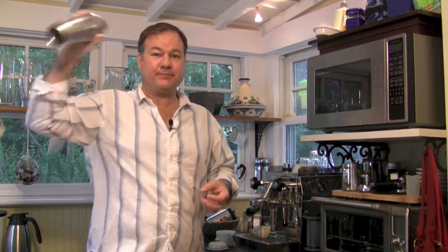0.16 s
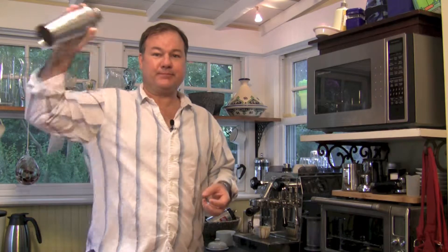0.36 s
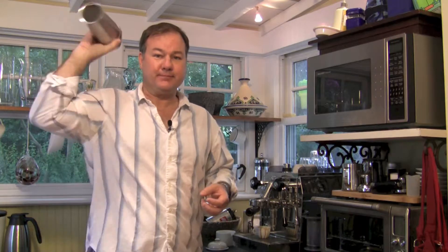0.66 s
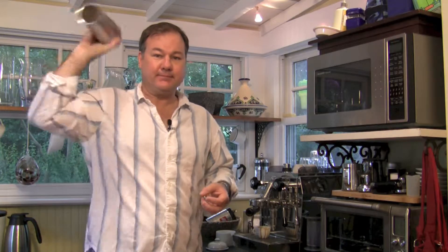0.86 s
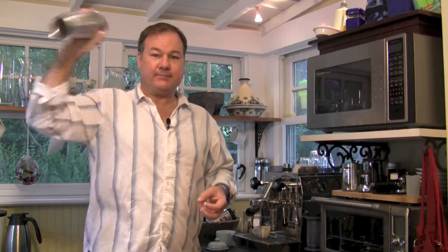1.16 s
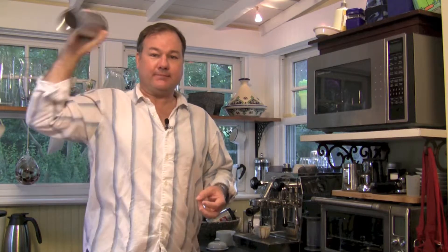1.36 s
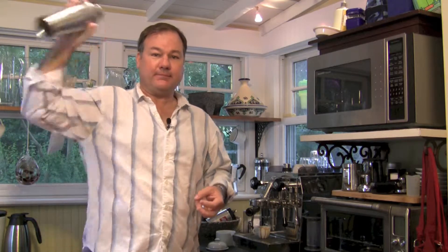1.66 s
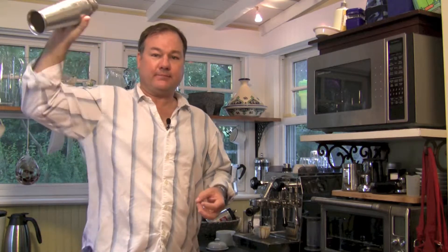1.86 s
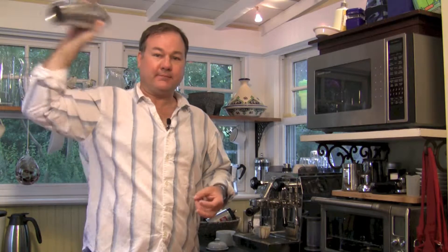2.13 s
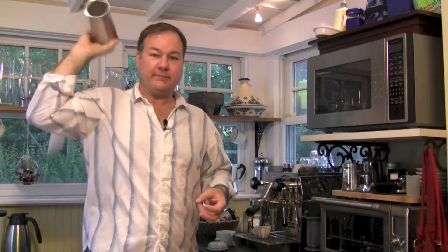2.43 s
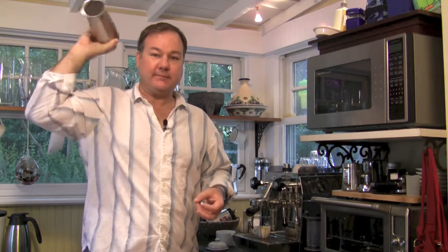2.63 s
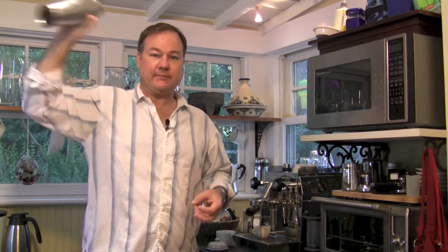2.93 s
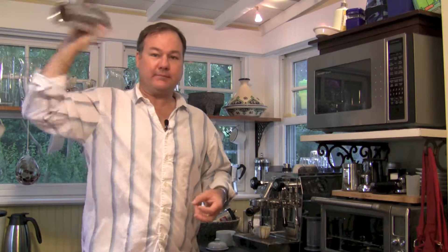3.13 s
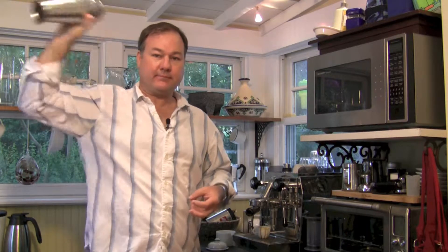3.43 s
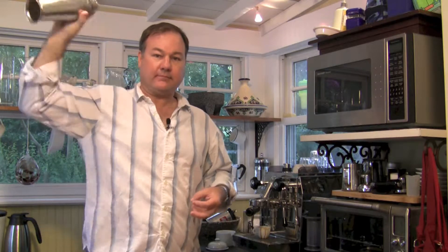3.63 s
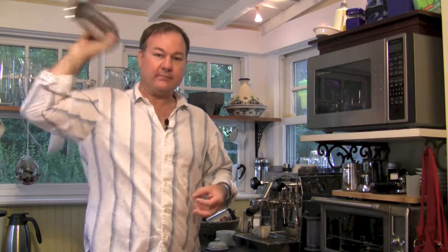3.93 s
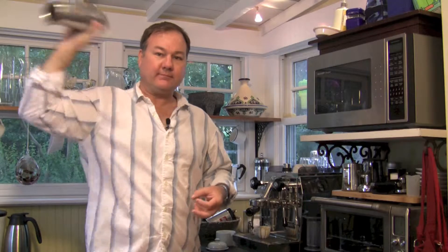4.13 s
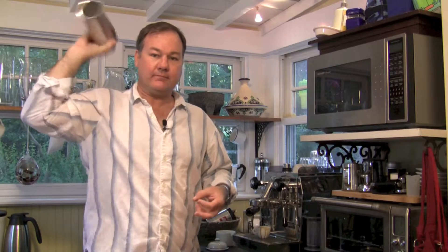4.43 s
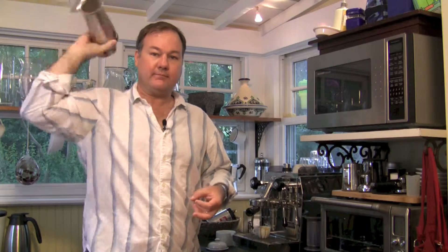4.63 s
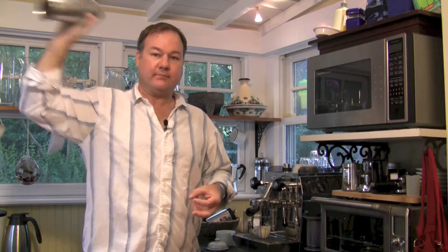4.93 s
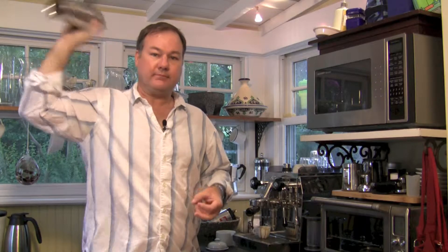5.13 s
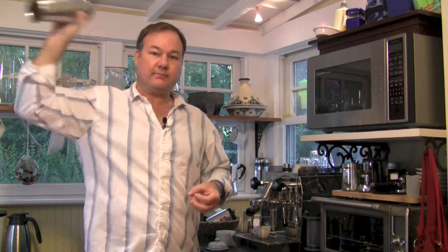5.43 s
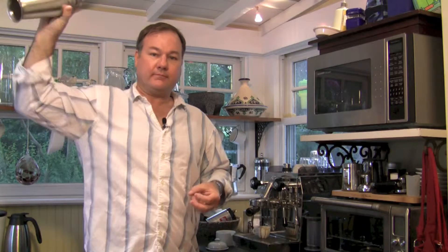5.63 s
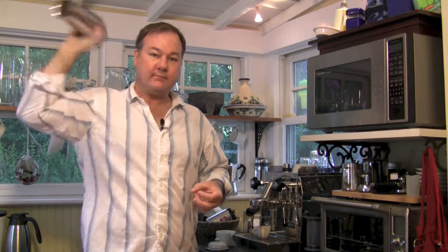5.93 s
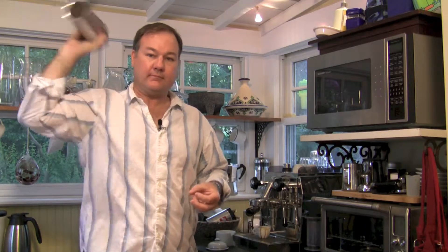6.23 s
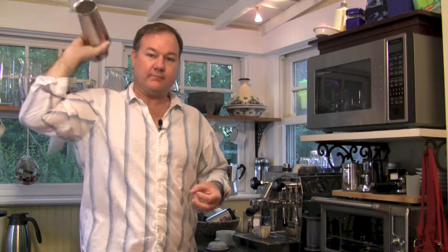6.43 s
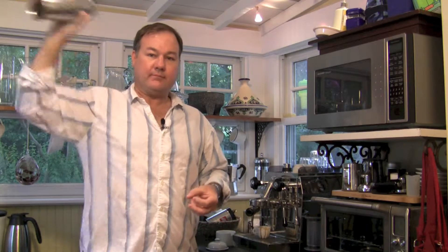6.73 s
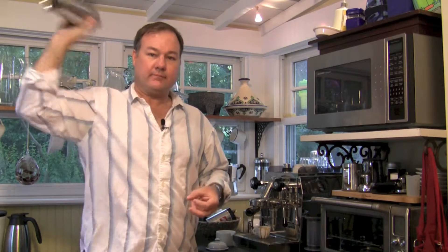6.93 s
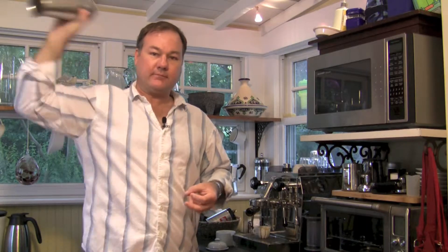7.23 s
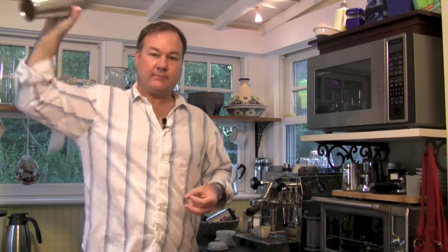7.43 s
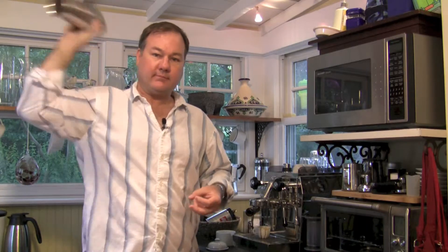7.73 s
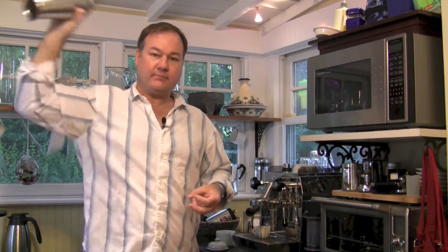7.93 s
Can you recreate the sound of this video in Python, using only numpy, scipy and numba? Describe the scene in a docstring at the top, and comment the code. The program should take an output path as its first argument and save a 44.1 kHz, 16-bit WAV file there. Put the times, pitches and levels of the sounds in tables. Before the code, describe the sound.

Ice and drink are shaken hard in a hand-damped steel shaker, already in motion at the start and never stopping. About four and a half full shakes a second, each giving a strong bright crash at the outer end and a softer one as the ice falls back. Lone cubes knock, chips graze and liquid sloshes between. Small live kitchen, clip-on microphone, low rumble of arm and shirt.

```python
"""Ice and a drink shaken hard in a hand-damped steel cocktail shaker, 4.5 times a second, in a small kitchen.
Ice: swarms of impacts at each turn of the arm, with lone cubes and grazing chips, excite the tin's resonances.
Cubes crack against each other in short high rings.
Drink: random bubble rings slosh between crashes; filtered noise sprays around each crash.
The shaker echoes in the room over a rumble of arm and shirt at a clipped-on microphone and steady noise."""
import sys
import numpy as np
from scipy import signal
from scipy.fft import rfft, irfft, next_fast_len
from scipy.io import wavfile
from numba import njit

SR = 44100
rng = np.random.default_rng(int(sys.argv[2]) if len(sys.argv) > 2 else 0)


def put_to_file(sound):
    """Save the sound as 16-bit audio at rate SR, in the file named by the first command-line argument."""
    columns = np.atleast_2d(sound).T  # one column per channel
    safe = np.clip(columns, -1, 1)
    whole_steps = np.round(safe * 32767)
    wavfile.write(sys.argv[1], SR, whole_steps.astype(np.int16))


N = 355887

# steady kitchen background: (frequency [Hz], relative density [dB per Hz])
BACKGROUND_SPECTRUM = [(30, 0), (120, -5.5), (250, -6), (1000, -23), (4000, -10.5), (16000, -26)]
# rumble of moving arm and shirt: (time [s], relative level [dB])
RUMBLE_LEVEL = [(0, -40), (.04, -39), (.09, -49), (.3, -46), (.5, -47.5), (2, -46), (4, -47.5), (6, -49),
                (8.07, -48)]
# colour of that rumble: (frequency [Hz], relative density [dB per Hz])
RUMBLE_SPECTRUM = [(12, -6.5), (24, 2.5), (36, -3), (48, -6), (60, -4.5), (85, -14), (125, -12),
                   (200, -21.5), (400, -28), (1500, -56)]
# drink growing louder as it froths: (time [s], relative level [dB])
FROTH_LEVEL = [(0.0, -38), (0.29, -33.5), (5.62, -35), (6.43, -31), (8.07, -34)]
# bubbles and splashes: (frequency [Hz], relative level [dB])
BUBBLE_SPECTRUM = [(300, -12), (450, -21), (700, -1), (1000, -6.5), (1300, -2.5), (1650, 12.5), (2100, 7.5),
                   (2800, 6.5)]
# resonances of the filled, held tin:
# (frequency [Hz], width [Hz], outer-end strike level [dB], inner-end strike level [dB])
TIN_MODES = [(331.5, 20, -36, -22), (364, 190, -23.5, -41), (557, 244, -18.5, -16.5),
             (983, 270, -17, -14.5), (1588, 124, -10, -18.5), (2221, 93, -5, 3.5), (2335, 193, -0.5, 0),
             (3220, 240, -1, -4), (3449, 180, -0.5, 0), (4050, 130, -16.5, -39), (4693, 104, -13, -42),
             (4840, 960, -48, -24), (6760, 460, -59, -12), (7380, 370, -15, -25.5), (8010, 930, -15, -12),
             (10140, 470, -16.5, -15), (11630, 1500, -15, -15), (14800, 600, -16, -24)]
# spectral shift with contact hardness: (frequency [Hz], slope [dB per dB of hardness])
HARDNESS_TILT = [(400, 0.2), (1400, 0.28), (2250, -.5), (3400, 0.53), (4900, 1.5), (6300, 0.16),
                 (14000, 0.4)]
# lone cubes striking the wall squarely: (time [s], relative level [dB], centre of the sound [Hz])
LONE_KNOCKS = [(0.1071, -16.1, 3070), (0.1203, -7.6, 2450), (0.3437, -10.9, 2670), (0.3496, -8.5, 3060),
               (0.4255, -16.5, 2360), (0.5566, -10.7, 3240), (0.7644, -14.2, 4030), (0.9663, -11.6, 3110),
               (0.9855, -8.6, 3370), (1.0909, -13.7, 2640), (1.1986, -12.3, 3380), (1.2937, -12.9, 2570),
               (1.4158, -11.5, 2970), (1.4343, -9.1, 2960), (1.6311, -11.0, 3350), (1.7582, -12.1, 2330),
               (1.8257, -17.9, 3890), (1.8778, -9.5, 3210), (2.0563, -13.6, 2940), (2.0807, -9.3, 3390),
               (2.2026, -11.7, 2530), (2.2732, -14.1, 4020), (2.3127, -8.4, 2970), (2.5163, -12.5, 3250),
               (2.7231, -13.4, 3750), (2.9208, -12.9, 3570), (3.0859, -10.3, 2840), (3.1433, -15.1, 4100),
               (3.2916, -11.6, 2630), (3.6172, -10.0, 3330), (3.7215, -8.9, 2370), (3.846, -11.0, 2840),
               (3.9752, -12.7, 2740), (4.2853, -11.0, 3440), (4.4026, -9.4, 2450), (4.5134, -11.1, 3310),
               (4.5371, -8.8, 3300), (4.6185, -12.8, 2620), (4.6348, -9.0, 2990), (4.7264, -13.1, 3570),
               (4.8452, -13.5, 2440), (4.9515, -10.1, 3240), (4.9568, -10.4, 3120), (5.0721, -12.0, 3020),
               (5.1674, -11.3, 3640), (5.2059, -12.8, 3390), (5.3667, -13.9, 3850), (5.5197, -10.4, 2450),
               (5.6082, -12.2, 3050), (5.6513, -11.8, 3270), (5.7721, -10.8, 2450), (5.7846, -14.3, 3650),
               (6.051, -12.7, 3930), (6.1365, -15.6, 1980), (6.2747, -11.3, 3870), (6.4044, -12.9, 2330),
               (6.5012, -10.1, 3540), (6.6271, -11.2, 2330), (6.7446, -9.8, 2880), (7.1739, -12.5, 3450),
               (7.1911, -8.3, 3110), (7.2866, -8.5, 2890), (7.4217, -10.0, 3170), (7.6414, -16.1, 2930),
               (7.8979, -13.0, 2800)]
# ice falling back into the inner end, softer, less even:
# (time [s], relative level [dB], spread of the landing [s])
INNER_CRASHES = [(0.013, -21.5, 0.011), (0.228, -14.5, 0.022), (0.454, -15.5, 0.013), (0.684, -16.5, 0.013),
                 (0.9, -17, 0.01), (1.104, -19.5, 0.011), (1.313, -14.5, 0.014), (1.523, -19.5, 0.015),
                 (1.763, -18, 0.014), (1.983, -19.5, 0.011), (2.201, -16, 0.017), (2.415, -17, 0.015),
                 (2.638, -18.5, 0.014), (2.865, -16.5, 0.016), (3.085, -16.6, 0.015), (3.304, -17, 0.015),
                 (3.518, -14.5, 0.014), (3.73, -17, 0.01), (3.971, -18.5, 0.013), (4.195, -14.5, 0.013),
                 (4.412, -16.5, 0.013), (4.636, -18, 0.013), (4.87, -17.9, 0.016), (5.078, -15, 0.014),
                 (5.3, -18.8, 0.011), (5.525, -20, 0.014), (5.74, -14.5, 0.012), (5.966, -16.5, 0.011),
                 (6.185, -16, 0.012), (6.423, -16.5, 0.015), (6.645, -16.5, 0.013), (6.867, -17.2, 0.013),
                 (7.074, -13.5, 0.015), (7.299, -16.5, 0.017), (7.536, -16, 0.013), (7.787, -17.5, 0.011),
                 (8.027, -18, 0.012)]
# ice landing in the outer end, equal force: (time [s], brightness [dB], spread of the landing [s])
OUTER_CRASHES = [(0.123, -12, 0.0095), (0.349, -6, 0.011), (0.576, -0.5, 0.012), (0.785, 1, 0.011),
                 (0.993, -4, 0.016), (1.217, 0, 0.011), (1.426, -7, 0.013), (1.651, 1, 0.0089),
                 (1.869, -0.5, 0.012), (2.087, 1, 0.013), (2.305, 3, 0.017), (2.534, 1, 0.011),
                 (2.743, 4.5, 0.012), (2.963, 1.5, 0.016), (3.186, 1.5, 0.014), (3.408, 2, 0.014),
                 (3.631, 2.5, 0.01), (3.853, -1, 0.0092), (4.075, 1, 0.014), (4.301, -4, 0.011),
                 (4.526, -3, 0.013), (4.748, 2, 0.01), (4.968, -2.5, 0.013), (5.181, -5.5, 0.011),
                 (5.401, 1.5, 0.013), (5.627, -3, 0.0086), (5.848, -3, 0.014), (6.079, 5, 0.013),
                 (6.298, 2, 0.015), (6.526, -4, 0.016), (6.755, 1, 0.013), (6.984, 4.5, 0.018),
                 (7.203, 3.4, 0.013), (7.435, -1, 0.013), (7.67, -2, 0.015), (7.911, -2, 0.012)]

OUT_BASE_DB = -13
KNOCK_LENGTH_S = 0.0016  # nominal clack length, sets its energy
CHATTER_S = 0.00045  # nominal time between corner touches
CUBE_RING_LOW_HZ, CUBE_RING_HIGH_HZ = 4120, 5220  # largest to smallest cube
LEAD_MAX_S, LEAD_MIN_S = 0.034, 0.008  # a lone cube this far before mid-crash leads the load
FOLLOW_S = 0.002  # least delay of held-up ice behind the leader
HELD_SHARE = 0.52  # chance that an impact is held behind the leader
CUTOFF_HZ = 15900


def from_db(db):
    """Decibels to amplitude gain."""
    return 10 ** (np.asarray(db) / 20)


def rms_one(x):
    """Scale to unit rms."""
    return x / np.sqrt(np.mean(x ** 2) + 1e-20)


def unit_rows(x):
    """Scale each row to unit energy."""
    return x / np.sqrt(np.sum(x ** 2, axis=1, keepdims=True))


def at_hz(points, hz):
    """Interpolate a dB spectrum over log frequency."""
    f_hz, db = np.transpose(points)
    return np.interp(np.log(np.maximum(hz, 1)), np.log(f_hz), db)


def coloured_noise(points):
    """White noise shaped to a spectrum, unit rms."""
    gain = from_db(at_hz(points, np.arange(N // 2 + 1) * SR / N))
    return rms_one(irfft(rfft(rng.standard_normal(N)) * gain, N))


def soften(x, hz, kind, order=2):
    """Butterworth low-pass or high-pass."""
    return signal.sosfilt(signal.butter(order, min(hz, .45 * SR), kind, fs=SR, output="sos"), x)


def clicks(times_s, sizes):
    """Impulse train."""
    at = np.round(times_s * SR).astype(int)
    inside = (at >= 0) & (at < N)
    return np.bincount(at[inside], sizes[inside], N) + 1e-18  # offset avoids denormals


def ring(x, hz, width_hz):
    """Fixed resonance, normalized to keep a click's energy."""
    r = np.exp(-np.pi * width_hz / SR)
    numerator = np.sqrt((1 - r * r) / 2) * np.array([1, 0, -1])
    return signal.lfilter(numerator, [1, -2 * r * np.cos(2 * np.pi * hz / SR), r * r], x)


@njit
def moving_ring(x, pull, r, hop):
    """Energy-keeping resonance; pull (cosine of phase step) changes every hop samples."""
    out = np.zeros(len(x))
    y1 = y2 = 0.0
    for i in range(len(x)):
        y = x[i] + 2 * r * pull[i // hop] * y1 - r * r * y2
        out[i] = (y - y2) * ((1 - r * r) / 2) ** .5
        y1, y2 = y, y1
    return out


def drift(times_s, rate_hz):
    """Slow random curve: Gaussian knots joined by lines."""
    knots = rng.standard_normal(400)
    return 1.55 * np.interp(times_s * rate_hz, np.arange(len(knots)), knots)


def since_out_stroke(times_s):
    """Shaking phase: 0 at one outward crash, 1 at the next."""
    crash_s = np.array(OUTER_CRASHES)[:, 0]
    period_s = np.mean(np.diff(crash_s))
    crash_s = np.concatenate([[crash_s[0] - period_s], crash_s, [crash_s[-1] + period_s]])
    return np.interp(times_s, crash_s, np.arange(len(crash_s))) % 1


def arm_rumble(swing_db, lead, level_db):
    """Coloured noise swelling twice a cycle as the shirt tugs at the microphone before each turn."""
    t_s = np.arange(N) / SR
    tug_db = swing_db * np.cos(2 * np.pi * 2 * (since_out_stroke(t_s) + lead))
    rumble_db = np.interp(t_s, *np.transpose(RUMBLE_LEVEL)) + tug_db + level_db
    return from_db(rumble_db) * coloured_noise(RUMBLE_SPECTRUM)


def room_response(early_db, tail_db, t60_s, treble_t60_s, count=14):
    """Close echoes from ceiling, window and cupboards, then a short tail whose treble dies first."""
    t_s = np.arange(SR // 3) / SR
    delays_s = np.geomspace(.003, .024, count) * rng.uniform(.85, 1.15, count)
    early = clicks(delays_s, rng.choice([-1, 1], count) / np.sqrt(delays_s))[:len(t_s)]
    noise = rng.standard_normal(len(t_s))
    dull = soften(noise, 3900, "low", order=1)
    tail = dull * from_db(-60 * t_s / t60_s)
    tail = tail + 1.55 * (noise - dull) * from_db(-60 * t_s / treble_t60_s)
    tail = tail * np.clip(t_s / 0.0082 - .5, 0, 1)
    early, tail = unit_rows(np.array([early, tail]))
    return from_db(early_db) * early + from_db(tail_db) * tail


def kitchen(x, count=12):
    """The tin moves, so each 25 ms block is convolved with a randomly chosen set of echoes."""
    hop = SR // 40
    responses = np.array([room_response(early_db=-13.0, tail_db=-8.0, t60_s=0.36, treble_t60_s=0.19)
                          for _ in range(count)])
    span = next_fast_len(hop + responses.shape[1], real=True)
    places = rfft(responses, span)
    out = np.zeros(N + span)
    for i in range(0, N, hop):
        out[i:i + span] += irfft(rfft(x[i:i + hop], span) * places[rng.integers(count)], span)
    return out[:N]


def slosh(peak_place, width, surge_db, cycles, uneven_db, count):
    """Short bubble rings, loudest in a gulp as the drink runs back along the tin."""
    times_s = rng.random(count) * N / SR
    gulp_db = surge_db * np.exp(-((since_out_stroke(times_s) - peak_place) / width) ** 2)
    sizes = from_db(gulp_db + uneven_db * np.minimum(rng.exponential(1, count), 4))
    sizes = sizes * rng.choice([-1, 1], count)
    pitches_hz = np.geomspace(300, 2800, 28)
    dealt = np.arange(count) % len(pitches_hz)
    out = np.zeros(N)
    for k, hz in enumerate(pitches_hz):
        train = clicks(times_s[dealt == k], sizes[dealt == k])
        out += from_db(at_hz(BUBBLE_SPECTRUM, hz)) * ring(train, hz, hz / cycles)
    return rms_one(out)


def spray(strokes, delay_s, length_s, low_hz, high_hz):
    """Drink and slush hiss along the wall: band-limited noise surges that follow crash level."""
    s, db = strokes[:2]
    t = np.arange(SR // 4) / SR / length_s
    surge = signal.fftconvolve(clicks(s + delay_s, from_db(db)), t * np.exp(1 - t))[:N]
    hiss = soften(soften(rng.standard_normal(N), low_hz, "high"), high_hz, "low")
    return surge * rms_one(hiss)


def chips(level_db, uneven_db, tilt_db, varied_db, swing_db, peak_place, count):
    """Splinters and flying cubes graze the wall throughout, swelling once per arm cycle."""
    times_s = (np.arange(count) + rng.random(count)) * N / SR / count
    place = since_out_stroke(times_s)
    swell_db = swing_db * np.cos(2 * np.pi * (place - peak_place))
    sizes = from_db(uneven_db * np.minimum(rng.exponential(1, count), 4) + swell_db)
    sizes = from_db(level_db) * rms_one(sizes) * np.sqrt(N / count)
    hardness_db = tilt_db + varied_db * rng.standard_normal(count)
    return [times_s, sizes, np.sin(np.pi * place * .8) ** 2, hardness_db]


def leading_ticks(lead_s, scatter_s, tilt_db, level_db, count):
    """A few cubes fly ahead of the load and tick brightly on bare steel."""
    crash_s = np.repeat(np.array(OUTER_CRASHES)[:, 0], count)
    chance = rng.standard_normal((len(crash_s), 2))
    times_s = crash_s - lead_s + scatter_s * chance[:, 0]
    sizes = from_db(level_db + 3.7 * chance[:, 1]) * np.sqrt(KNOCK_LENGTH_S * SR)
    return [times_s, sizes, np.zeros(len(times_s)), np.full(len(times_s), tilt_db)]


def behind_leader(s, times_s):
    """Where a lone cube leads a crash, a random share of the earlier ice is held up behind it."""
    knock_s = np.array(LONE_KNOCKS)[:, 0]
    leads = (knock_s > s - LEAD_MAX_S) & (knock_s < s - LEAD_MIN_S)
    front_s = np.where(leads.any(axis=1), knock_s[leads.argmax(axis=1)] + FOLLOW_S, -1)[:, None]
    held = rng.random(times_s.shape) < HELD_SHARE
    return np.where(held, front_s + np.abs(times_s - front_s), times_s)


def cube_hits(s, db, hardness_db, count=3):
    """A whole cube touches the wall with several corners in quick, weakening succession."""
    times_s = s[:, None] + CHATTER_S * (np.arange(count) + .8 * rng.random((len(s), count)))
    sizes = unit_rows(from_db(2 * rng.standard_normal(times_s.shape) - 4.8 * np.arange(count)))
    sizes = sizes * from_db(db)[:, None] * np.sqrt(KNOCK_LENGTH_S * SR)
    inner = np.sin(np.pi * since_out_stroke(times_s.ravel())) ** 4
    return [times_s.ravel(), sizes.ravel(), inner, np.repeat(hardness_db, count)]


def knocks(level_db, hardness_db, centre_hz):
    """Lone cubes; a higher sound centre means a harder contact (hardness_db per octave)."""
    s, db, hz = np.transpose(LONE_KNOCKS)
    return cube_hits(s, db + level_db, hardness_db * np.log2(hz / centre_hz))


def heavy_cubes(strokes, first, span, level_db, uneven_db, tilt_db, dulling_db, varied_db, count):
    """Whole cubes clack out of each crash; first (lead) and span (duration) count in spreads."""
    s, db, bright_db, spread_s = strokes[:, :, None]
    place = (np.arange(count) + rng.random((len(s), count))) / count
    levels_db = db + level_db + uneven_db * rng.uniform(-0.95, 1, place.shape)
    hardness_db = tilt_db + bright_db - dulling_db * place + varied_db * rng.standard_normal(place.shape)
    times_s = behind_leader(s, s + spread_s * (span * place - first))
    return cube_hits(times_s.ravel(), levels_db.ravel(), hardness_db.ravel())


def clashes(strokes, lead, scatter, level_db, uneven_db, colour, width_hz, count, size=9):
    """Cube cracks on cube around the crash front; each rings briefly at one of several pitches."""
    s, db, bright_db, spread_s = strokes[:, :, None]
    place = 2 * (np.arange(count) + rng.random((len(s), count))) / count - 1
    times_s = behind_leader(s, s + spread_s * (scatter * place - lead)).ravel()
    window = np.cos(np.pi * place / 2) ** .5
    sizes = unit_rows(from_db(uneven_db * rng.standard_normal(place.shape)) * window)
    sizes = (sizes * from_db(db + level_db + colour * bright_db)).ravel() * np.sqrt(KNOCK_LENGTH_S * SR)
    dealt = rng.integers(0, size, len(times_s))
    pitches_hz = np.geomspace(CUBE_RING_LOW_HZ, CUBE_RING_HIGH_HZ, size)
    return sum(ring(clicks(times_s[dealt == k], sizes[dealt == k]), hz, width_hz)
               for k, hz in enumerate(pitches_hz))


def return_strokes(dulling):
    """Rows time, level, brightness, spread: the more ice falls back at once, the duller it lands."""
    s, db, spread_s = np.transpose(INNER_CRASHES)
    return np.array([s, db, -dulling * (db - db.mean()), spread_s])


def outward_strokes():
    """Rows time, level, brightness, spread: equal strength, differing in bare steel met."""
    s, bright_db, spread_s = np.transpose(OUTER_CRASHES)
    return np.array([s, np.full(len(s), OUT_BASE_DB), bright_db, spread_s])


def crashes(strokes, inner, build_share, fall_share, level_db, uneven_db, tilt_db, dulling_db,
            colour, count):
    """The load lands as a swarm; positive dulling softens later impacts, negative hardens them."""
    s, db, bright_db, spread_s = strokes[:, :, None]
    build_s, fall_s = build_share * spread_s, fall_share * spread_s
    # every fourth of a sorted draw: a bell-shaped swarm, evenly filled
    place = np.sort(rng.standard_normal((len(s), count * 4)), axis=1)[:, 1::4]
    place = place + .8 * (fall_s - build_s) / (fall_s + build_s)
    times_s = s + place * np.where(place < 0, build_s, fall_s)
    centred_s = times_s - (times_s.mean(axis=1, keepdims=True) - s)
    times_s = behind_leader(s, centred_s)
    energy = SR * np.sqrt(np.pi / 2) * np.mean(build_s + fall_s)
    sizes = unit_rows(from_db(uneven_db * rng.standard_normal(times_s.shape)))
    sizes = sizes * from_db(db + level_db) * np.sqrt(energy)
    hardness_db = tilt_db + colour * bright_db - dulling_db * place
    return [times_s.ravel(), sizes.ravel(), np.full(times_s.size, inner), hardness_db.ravel()]


def strike_tin(hits, spot_db, wetting_db, detune, swirl_hz, size=64):
    """Hits share energy among modes; swirling drink loads the wall, so pitch and strength wander."""
    times_s, sizes, inner, hardness_db = hits  # inner: 0 outer end, 1 inner end
    hz, width_hz, outer_db, inner_db = np.transpose(TIN_MODES)
    chance = rng.standard_normal((len(times_s), 2, len(hz)))
    wetting = np.transpose([drift(times_s, swirl_hz) for _ in hz])
    share_db = outer_db + np.outer(inner, inner_db - outer_db)
    share_db = share_db + np.outer(hardness_db, at_hz(HARDNESS_TILT, hz))
    share_db = share_db + spot_db * chance[:, 0] + wetting_db * wetting
    gains = unit_rows(from_db(share_db)) * np.sign(chance[:, 1]) * sizes[:, None]
    out = np.zeros(N)
    for gain, f_hz, width in zip(gains.T, hz, width_hz):
        pitch_hz = f_hz * (1 + detune * drift(np.arange(0, N, size) / SR, swirl_hz))
        pull = np.cos(2 * np.pi * pitch_hz / SR)
        out += moving_ring(clicks(times_s, gain), pull, np.exp(-np.pi * width / SR), size)
    return out


def scene():
    """Shaker in its room, over rumble and background."""
    outward, back = outward_strokes(), return_strokes(dulling=.4)
    hits = np.hstack([
        crashes(outward, 0, build_share=.9, fall_share=1.0, level_db=-1.9, uneven_db=4.0,
                tilt_db=-2.0, dulling_db=1.5, colour=0.64, count=48),
        crashes(back, 1, build_share=.6, fall_share=1.25, level_db=-0.68, uneven_db=2.5,
                tilt_db=0.6, dulling_db=-1.9, colour=1.0, count=65),
        knocks(level_db=2.5, hardness_db=33.0, centre_hz=2820),
        heavy_cubes(outward, first=1.15, span=2.5, level_db=1.3, uneven_db=0.5,
                    tilt_db=5.5, dulling_db=4.5, varied_db=7.5, count=3),
        heavy_cubes(back, first=1.1, span=1.5, level_db=0.0, uneven_db=4.0,
                    tilt_db=-9.5, dulling_db=-9.0, varied_db=11.0, count=1),
        chips(level_db=-32, uneven_db=4.5, tilt_db=3.0, varied_db=2.5, swing_db=1.5,
              peak_place=0.84, count=6000),
        leading_ticks(lead_s=.036, scatter_s=.011, tilt_db=6.0, level_db=-24.0, count=2)])
    ice = strike_tin(hits, spot_db=2.5, wetting_db=1.78, detune=0.019, swirl_hz=16)
    cracks = clashes(outward, lead=.55, scatter=2.1, level_db=0.5, uneven_db=3.0, colour=0.86,
                     width_hz=390, count=6)
    ice += soften(cracks, 5500, "low", order=4)
    froth_db = np.interp(np.arange(N) / SR, *np.transpose(FROTH_LEVEL))
    drink = from_db(froth_db + 2.0) * slosh(peak_place=0.33, width=0.2, surge_db=6.0, cycles=7.2,
                                            uneven_db=3.0, count=7000)
    drink += from_db(-21.5) * spray(outward, delay_s=-0.003, length_s=0.037, low_hz=4970, high_hz=8150)
    drink += from_db(-23) * spray(back, delay_s=-0.015, length_s=0.03, low_hz=5360, high_hz=10500)
    shaker = ice + drink
    heard = soften(soften(shaker + kitchen(shaker), 8100, "low"), 89, "high")
    rumble = arm_rumble(swing_db=3.0, lead=0.096, level_db=5.5)
    background = from_db(-48.0) * coloured_noise(BACKGROUND_SPECTRUM)
    return (heard + rumble + background)[None]


def record(dry):
    """Round off the tallest peaks, then cut the top."""
    rounded = dry / (1 + np.abs(dry / .95) ** 6) ** (1 / 6)
    return signal.sosfiltfilt(signal.ellip(8, .05, 60, CUTOFF_HZ, fs=SR, output="sos"), rounded)


dry = scene()
out = record(dry)
put_to_file(out)
```